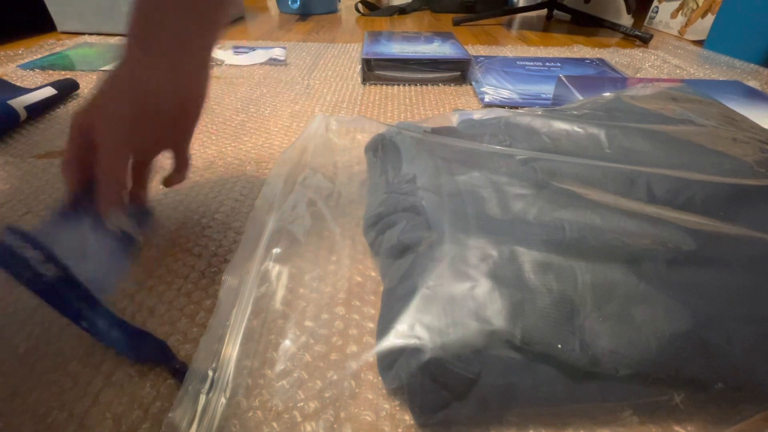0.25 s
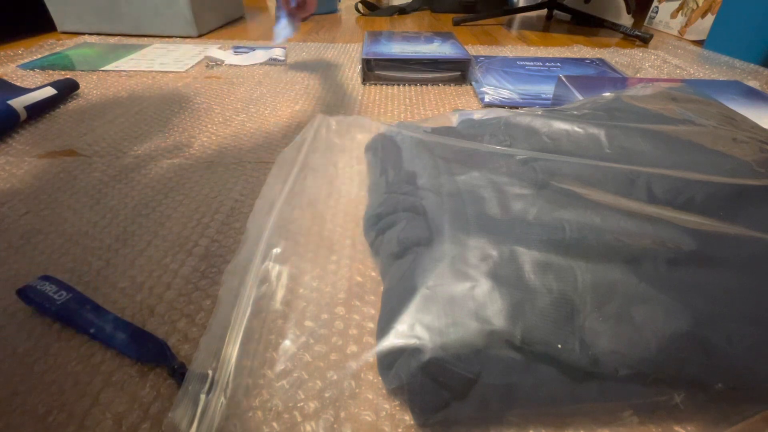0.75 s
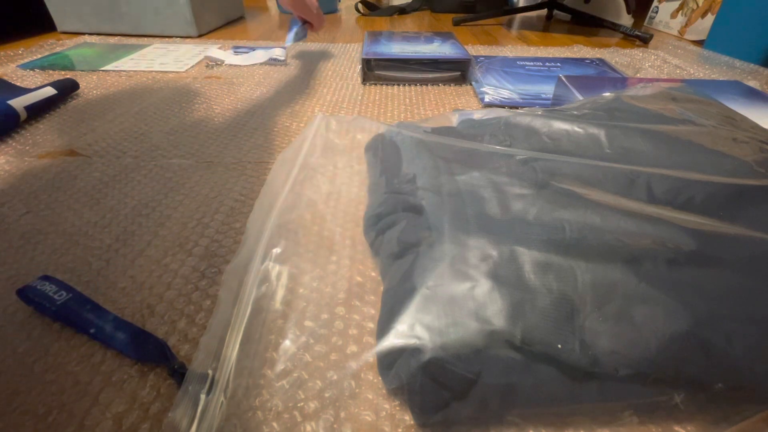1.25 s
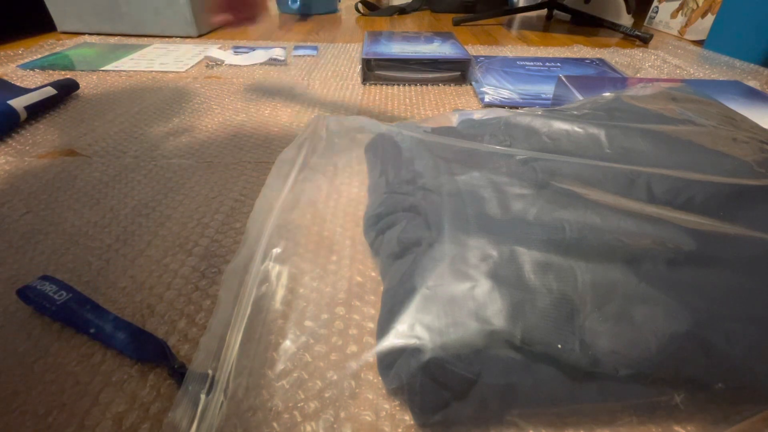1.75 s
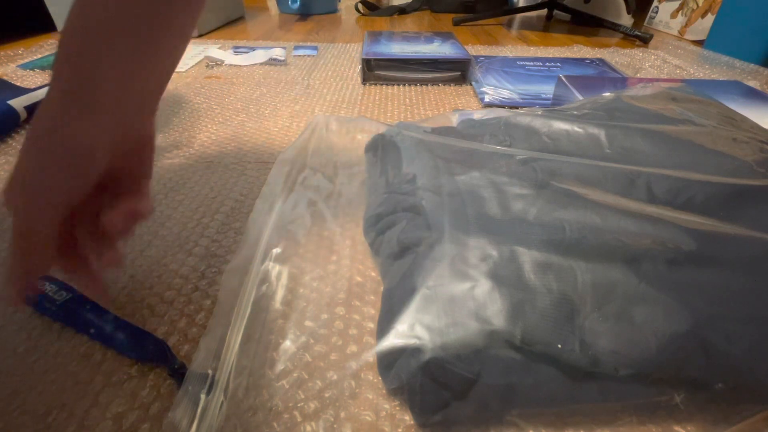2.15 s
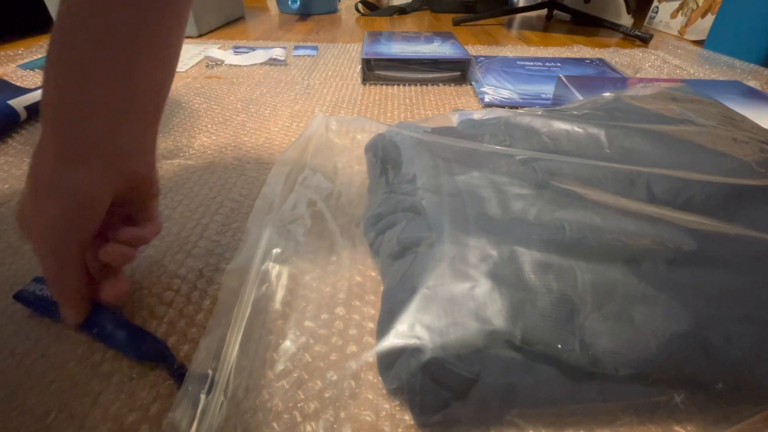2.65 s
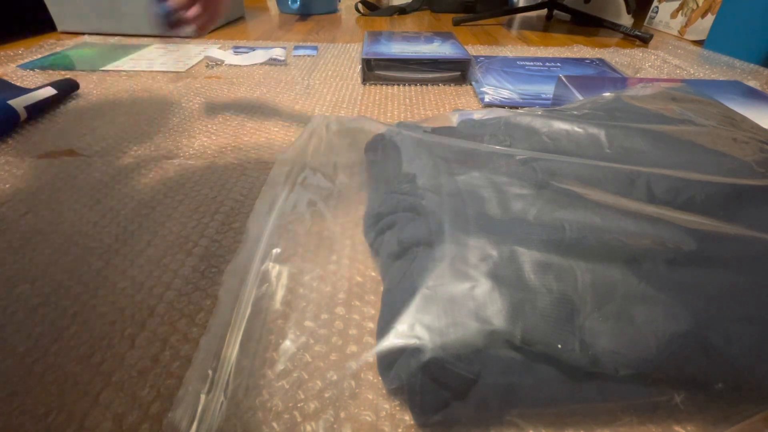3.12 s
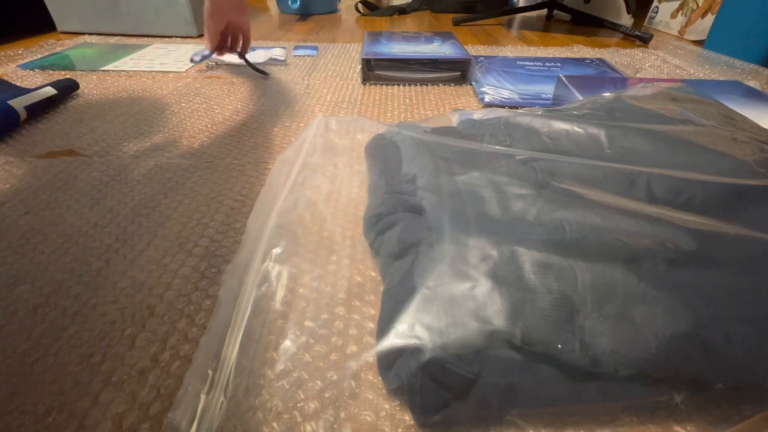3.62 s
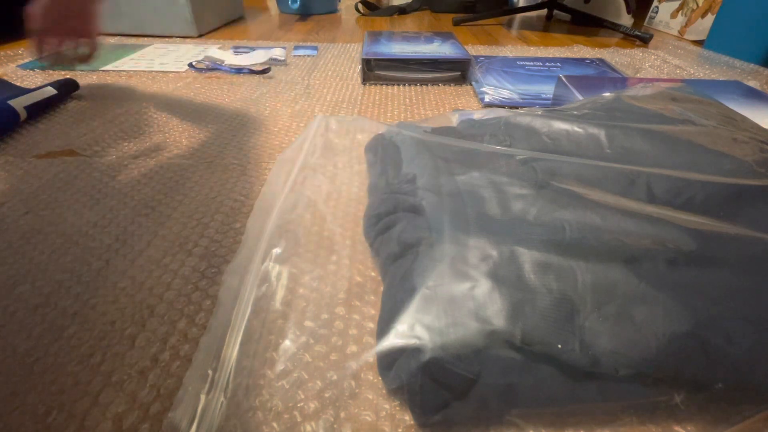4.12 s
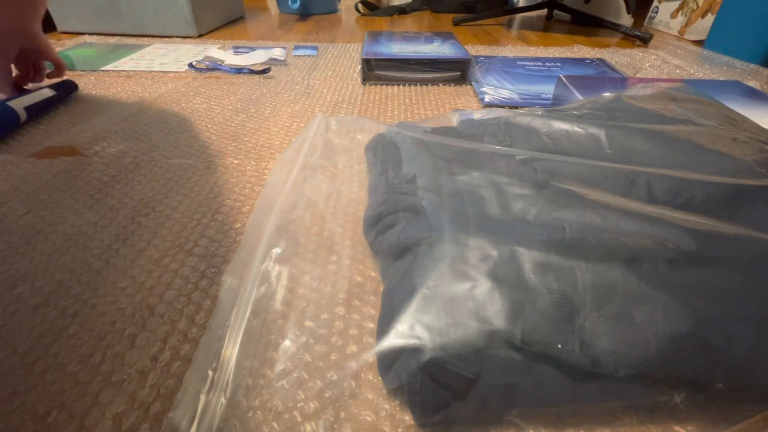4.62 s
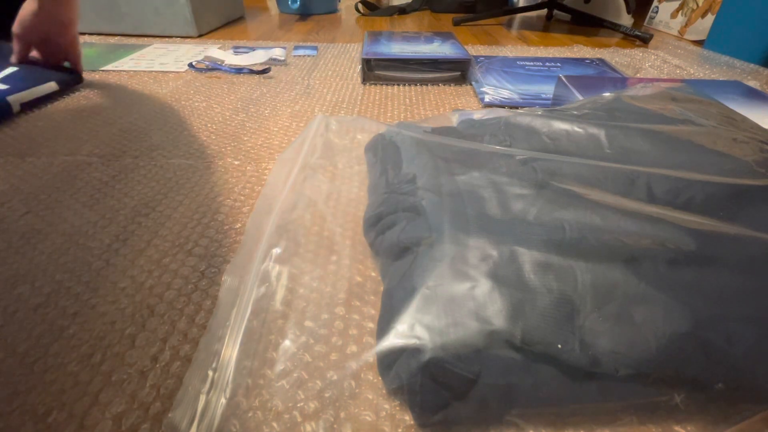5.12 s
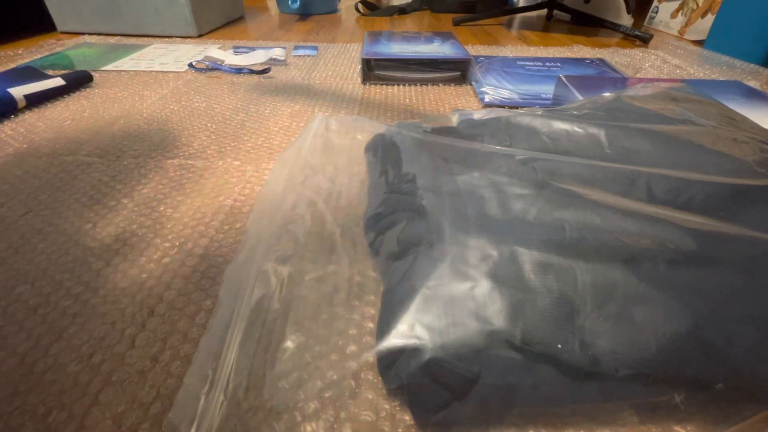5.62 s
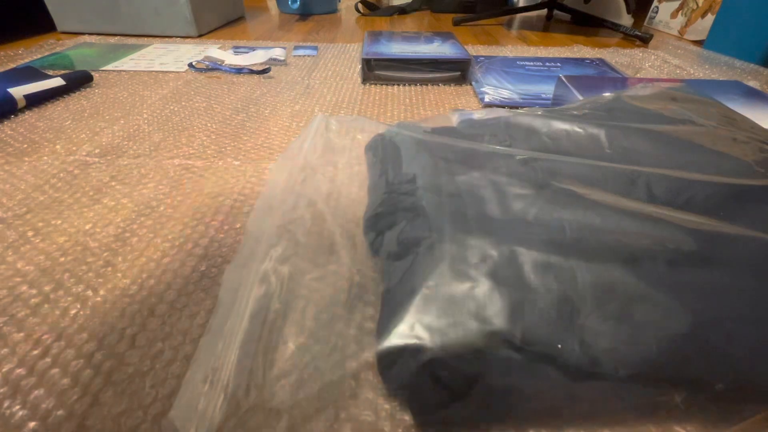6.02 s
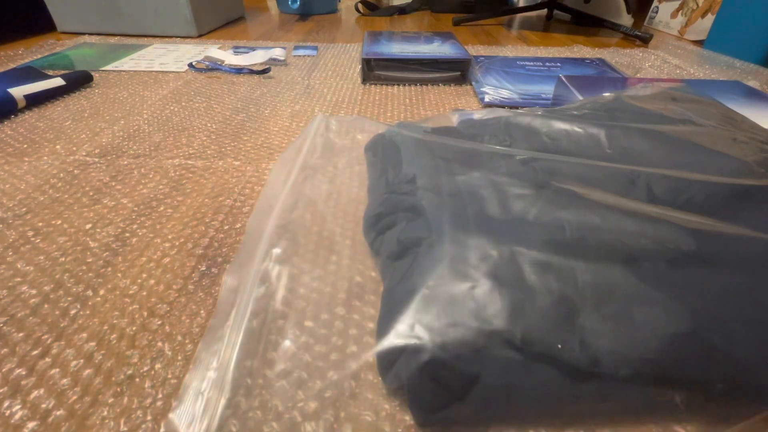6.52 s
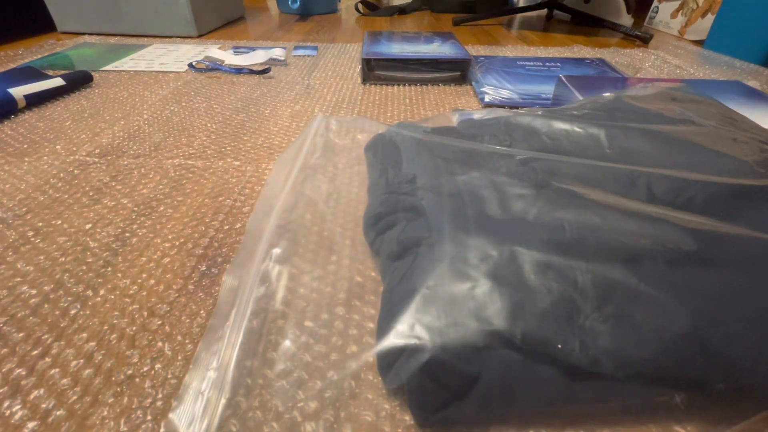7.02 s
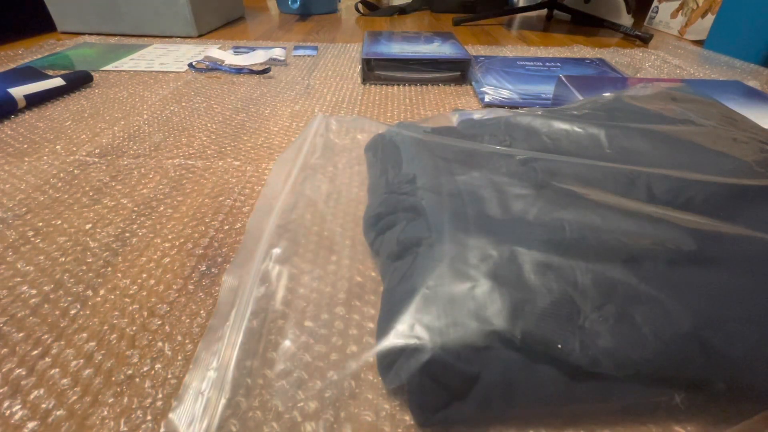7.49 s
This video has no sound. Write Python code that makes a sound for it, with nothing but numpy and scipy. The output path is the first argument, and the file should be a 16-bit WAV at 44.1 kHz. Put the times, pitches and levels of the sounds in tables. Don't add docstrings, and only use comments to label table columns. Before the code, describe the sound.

A hand close on the left squeezes thin plastic film in a bright crackling burst with small taps, then pauses. A second, drier crinkle follows as a strap is pinched and pulled. Softer hissing drags over bubble wrap come next. Finally the person gets up: cloth swishes, a sharp snap, a low heel thud and wooden board knocks. Stereo microphone on the floor of a quiet, lightly humming small room.

```python
import sys
import numpy as np
from scipy import signal
from scipy.fft import rfft, irfft
from scipy.io import wavfile
from scipy.ndimage import uniform_filter1d, map_coordinates

SR = 44100
rng = np.random.default_rng(int(sys.argv[2]) if len(sys.argv) > 2 else 0)


def gain_from_decibels(decibels):
    exponent = np.asarray(decibels, float) / 20
    return 10 ** exponent


def wav_out(sig):
    wavfile.write(sys.argv[1], SR, np.round(np.clip(np.atleast_2d(sig).T, -1, 1) * 32767).astype(np.int16))


N = 341775
HZ = np.fft.rfftfreq(N, 1 / SR) + 1e-3
SECONDS = np.arange(N) / SR


def rms_one(x):
    return x / np.sqrt(np.mean(x ** 2) + 1e-20)


def at_hz(points, hz=HZ):
    table_hz, values = np.transpose(points)
    return np.interp(np.log(hz), np.log(table_hz), values)


def coloured(x, spectrum):
    return rms_one(irfft(rfft(x) * gain_from_decibels(at_hz(spectrum)), N))


def band_pass(order, low_hz, high_hz):
    return signal.butter(order, [low_hz, high_hz], "band", fs=SR, output="sos")


def drift(rate_hz):
    knots = rng.standard_normal(2000)
    return rms_one(map_coordinates(knots, [np.arange(N) * rate_hz / SR], order=2))


def in_time(moves):
    t = np.arange(0, N + 32, 32) / SR
    main, second = 1e-14, 1e-14
    for s, db, rise_s, fall_s, other_db in moves:
        away = np.abs(t - s) / np.where(t < s, rise_s, fall_s)
        power = gain_from_decibels(db - 20 * away ** 1.44) ** 2
        main = main + power
        second = second + power * gain_from_decibels(other_db) ** 2
    return [np.interp(SECONDS, t, np.sqrt(power)) for power in (main, second)]


def add(out, s, piece):
    i = round(s * SR)
    out[..., i:i + piece.shape[-1]] += piece[..., :N - i]


def creases(per_s, spread_db, clump_db, patch_db, hiss):
    born = rng.random(N) < per_s * gain_from_decibels(clump_db * drift(70)) / SR
    sizes = rms_one(born * gain_from_decibels(spread_db * np.minimum(rng.exponential(1, N), 5)))
    dealt = rng.integers(0, 5, N)
    signs = rng.choice([-1, 1], (2, N))
    skin = hiss / 2 * rng.standard_normal((2, N))
    grain = 0
    for k, hz in enumerate(800 * 1.8 ** np.arange(5)):
        pops = sizes * signs * (dealt == k) + skin
        flicker = gain_from_decibels(patch_db * drift(35))
        grain = grain + flicker * signal.sosfilt(band_pass(1, hz, 1.9 * hz), pops)
    return grain / np.sqrt(uniform_filter1d(grain ** 2, size=1500))


# peak in seconds, rustle in dB, rise in seconds, fall in seconds,
# top of the rustle in dB relative to it.
SQUEEZES = [(0.0, -58.5, .05, 0.15, -6), (0.085, -58, 0.022, .14, -9), (0.15, -59.5, 0.059, 0.09, 3),
            (0.2, -47, 0.056, 0.071, -7), (0.352, -53.5, .008, 0.017, -9), (0.378, -64, .02, 0.026, -7),
            (1.368, -59.5, 0.013, 0.054, -4), (0.58, -81, 0.13, 0.36, -5), (0.84, -84, 0.16, 0.89, -2.5),
            (3.15, -98.5, .3, .4, 10), (2.205, -60.5, 0.015, 0.05, -8), (2.29, -69, 0.096, 0.15, -7.5),
            (2.345, -54.5, 0.017, 0.11, -12), (2.47, -60, 0.013, 0.13, -4),
            (2.555, -56.5, 0.022, 0.19, -2.5), (2.66, -57.5, 0.16, 0.1, -12), (2.76, -65, 0.011, 0.067, -1),
            (2.83, -59, 0.067, 0.062, -6), (2.888, -57, .02, 0.034, -10), (3.4, -76.5, 0.016, 0.099, 1),
            (3.52, -72, 0.03, 0.07, -2), (3.73, -72.5, 0.14, 0.079, -2.5)]
# frequency in Hz, level in dB per Hz.
FILM_COLOUR = [(410, -66), (700, -33), (972, -13), (1710, -13), (2100, -6), (3740, 1), (5570, 0.5),
               (6160, 4), (8660, 1.5), (10100, -17.5), (10500, -38), (13600, -37), (22000, -120)]
FILM_TOP_COLOUR = [(5880, -86), (10600, -9), (11600, -13), (12400, -7), (13100, -7.5), (14700, -16.5),
                   (15700, -15), (16300, -30)]


def crinkle():
    level, top = in_time(SQUEEZES)
    grain = creases(5000, spread_db=1.5, clump_db=6.0, patch_db=4.5, hiss=0.4)
    return level * coloured(grain, FILM_COLOUR) + gain_from_decibels(4.5) * top * coloured(grain, FILM_TOP_COLOUR)


# peak in seconds, hiss in dB, rise in seconds, # fall in seconds, top in dB relative to the hiss.
DRAGS = [(1.447, -57.5, .04, 0.091, -1.5), (4.46, -63, 0.088, 0.12, -2), (4.543, -65, .025, 0.11, -12),
         (4.72, -68, 0.026, 0.14, -15), (5.03, -60.5, 0.44, 0.3, -0.5), (5.18, -61.5, 0.29, 0.12, -12),
         (5.244, -56.5, 0.011, 0.074, -10), (5.65, -65, .25, 0.27, -0.5), (5.95, -73, 0.11, 0.19, 1.5),
         (6.085, -56, 0.026, 0.11, -18), (6.28, -70.5, 0.17, 0.24, -4), (6.505, -66.5, 0.043, 0.25, -5.5),
         (6.83, -67, 0.27, 0.56, -8), (7.05, -65.5, 0.42, 0.29, -4.5), (7.32, -70, 0.073, 0.062, -17),
         (7.72, -71.5, 0.37, 0.24, -7)]
# frequency in Hz, level in dB per Hz.
SHEET_COLOUR = [(410, -37), (700, -12), (1230, -1.5), (1660, -2.5), (2670, 3), (4340, -5), (5080, 1.5),
                (5500, -1.5), (6450, 1.5), (7470, -3), (8860, -5), (10500, -12), (13600, -47),
                (22000, -120)]
FAR_SHEET_COLOUR = [(880, -4), (1500, -10), (3300, -7.5), (5090, -6), (5610, -8.5), (8290, -2),
                    (10500, -9.5), (13600, -81), (22000, -120)]


def slide():
    stands_up_s = 5.4
    level, top = in_time(DRAGS)
    grain = creases(12000, spread_db=3.0, clump_db=4.5, patch_db=3.5, hiss=0.69)
    near, far = coloured(grain, SHEET_COLOUR), coloured(grain, FAR_SHEET_COLOUR)
    drag = np.where(SECONDS < stands_up_s, near, far)
    return gain_from_decibels(1.66) * level * drag + gain_from_decibels(-1.5) * top * coloured(grain, FILM_TOP_COLOUR)


def ring(clicks, hz, t60_s):
    decay = gain_from_decibels(-60 / (t60_s * SR))
    turn = 2 * np.pi * hz / SR
    return signal.lfilter([0, np.sin(turn)], [1, -2 * decay * np.cos(turn), decay ** 2], clicks)


# peak in seconds, peak in dB, top in dB relative to the peak, length in milliseconds.
CARD_CREASES = [(0.0039, -50, -3, 2.4), (0.0071, -52, 0, 2.5), (0.0184, -48, 0, 3.5), (0.031, -52, -8, 1.5),
                (0.044, -61, 9, 0.97), (0.074, -47, -3, 3.6), (0.0822, -57, 7, 1.2), (0.0881, -58, 9, 1.2),
                (0.1037, -47, -1, 1.8), (0.1168, -51, 2, 3.9), (0.1229, -55, 5, 1.3), (0.1583, -47, 7, 1.3),
                (0.1766, -35.5, -3, 2.9), (0.2119, -42, 7, 2.9), (0.2317, -49, -1, 1.4),
                (0.2591, -50, 0, 2.7), (0.2773, -62, -2, 1.5), (0.3522, -49.5, 2.5, 5.8),
                (0.3665, -60, 10, 1.4), (0.3774, -54, -4, 2.4), (0.4234, -65, -1, 1.3),
                (0.4353, -64, 8, 1.5), (0.4388, -68, 16, 1.4), (0.4623, -65, -2, 1.3),
                (0.4763, -59.5, -1, 1.7), (0.7468, -81, 18, 1.3), (1.1035, -61, 1, 1.8),
                (1.3643, -57, 5, 2.8), (1.3739, -58, -2, 2.2), (1.7333, -65, -16, 1.9)]
PULLED_CREASES = [(2.207, -43, 1.5, 3.4), (2.2165, -62, 9, 2.0), (2.2234, -55, 10, 1.2),
                  (2.2341, -64, 9, 1.2), (2.2678, -53, -13, 1.9), (2.2819, -61, -11, 1.8),
                  (2.2884, -61, -6, 2), (2.2927, -57, -11, 1.8), (2.2983, -64, 7, 1.3),
                  (2.3366, -55, -5, 2.1), (2.3404, -45, -9, 1.2), (2.3454, -48, -11, 1.2),
                  (2.3502, -47, -13, 1.4), (2.3546, -57, -4, 2), (2.3608, -53, -5, 2.0),
                  (2.376, -47, -3, 4.7), (2.4048, -53, -14, 1.6), (2.4103, -47, -9, 2.2),
                  (2.4166, -50, -1, 1.0), (2.4198, -44.5, 1, 2.5), (2.4236, -54, -7, 1.7),
                  (2.4293, -58, -3, 1.2), (2.4575, -59, 15, 1.1), (2.4629, -49, 9, 1.5),
                  (2.4699, -45.5, -13, 2.8), (2.4806, -53, -7, 2.8), (2.4964, -42, -1, 2.1),
                  (2.5441, -49, -5, 1.3), (2.5518, -40, -5, 1.7), (2.5635, -54, 5, 2.3),
                  (2.5932, -56, 8, 0.96), (2.5995, -48, 0, 3.2), (2.6066, -41, -10, 1.2),
                  (2.6103, -42, -5, 1.3), (2.6136, -47, 2, 1.2), (2.6466, -55, 2, 2.1),
                  (2.6615, -51, -1, 2.9), (2.7051, -53, 6, 3.2), (2.7353, -70, 13, 1.3),
                  (2.7404, -71, 11, 2.1), (2.7586, -48, -4, 2.5), (2.8356, -41.5, 1, 1.9),
                  (2.8386, -56, 11, 1.0), (2.8461, -45.5, -6, 3.1), (2.8577, -43.5, 1, 4.4),
                  (2.8709, -54, -9, 3.4), (2.8865, -41, 1, 4.4), (2.8926, -47, 8, 1.8)]
LAST_CREASES = [(3.2096, -65, 0, 1.4), (3.3453, -78, 15, 1.6), (3.3825, -67, -2, 1.7),
                (3.3995, -69, 11, 1.5), (3.4168, -70, 9, 2.1), (3.4322, -70, 5, 2.8), (3.4692, -68, 9, 2.8),
                (3.5048, -68, 9, 1.3), (3.5083, -58, 14, 1.4), (3.5444, -69, 12, 1.5),
                (3.6922, -57, -14, 1.4), (3.7349, -59, -4, 2.4), (3.9858, -80, 20, 1.6),
                (4.3012, -65, 5, 1.5), (4.5414, -56, -16, 4.1), (4.6639, -59, -14, 1.4),
                (4.679, -62, 0, 1.6), (4.7212, -59, -8, 1.8), (5.2498, -49, -18, 3.3), (5.327, -60, 8, 1.3),
                (5.6354, -56, -15, 2.9), (5.6715, -54, 8, 2.3), (5.6991, -53, -13, 3.2),
                (5.7375, -56, -12, 2.3), (5.8303, -65, -2, 1.2), (6.279, -60, -11, 2.9),
                (6.4054, -62, 2.5, 1.6), (6.4472, -62, -3, 2.8), (6.5257, -61, 4, 2.8)]
# peak in seconds, peak in dB, top in dB relative to the peak,
# length in milliseconds, ring in Hz.
SMALL_TAPS = [
    (0.109, -38.5, -10, 2.4, 2970),
    (0.1955, -43, -6, 2.5, 3384),
    (4.344, -59, 2, 1.5, 2640),
    (5.2426, -46.5, -12, 3.85, 1480),
    (5.3033, -45.5, -16, 2.0, 900),
    (5.61, -39.5, -14, 2.0, 2680),
    (5.627, -50, -25, 12, 1920),
    (5.805, -60, -20, 2.5, 2400),
    (5.843, -56, -20, 3, 2200),
]


def ticks():
    out = np.zeros(N)
    t_ms = np.arange(1, 1200) / SR * 1000
    top, wide = band_pass(2, 11600, 14500), band_pass(2, 2600, 9000)
    events = list(SMALL_TAPS)
    for row in list(CARD_CREASES) + list(PULLED_CREASES) + list(LAST_CREASES):
        film_hz = 6780 * (1 + 0.038 * rng.standard_normal())
        events.append((*row, film_hz))
    for s, peak_db, top_db, length_ms, hz in events:
        rise_ms = max(0.38 * (length_ms - .9), .07)
        pop = rng.standard_normal(len(t_ms)) * t_ms * np.exp(-t_ms / rise_ms)
        pop[round(rise_ms * SR / 1000)] = 1.6 * rise_ms
        body = rms_one(ring(pop, hz, 15 / hz)) + rms_one(signal.sosfilt(wide, pop))
        flick = signal.sosfilt(top, pop)
        body, flick = (v / np.sqrt(2 * uniform_filter1d(v ** 2, size=35).max()) for v in (body, flick))
        tick = gain_from_decibels(peak_db + 0.5) * (body + gain_from_decibels(top_db + 1.0) * flick)
        add(out, s - rise_ms / 1000 - .0003, tick)
    return out


def blow(colour, cycles, shortest_s, rise_s):
    t, out = np.arange(1, 14001) / SR, 0
    edges = 25 * 2 ** np.arange(0, 9.6, .5)
    for low, high in zip(edges, edges[1:]):
        hz = np.sqrt(low * high)
        t60_s = shortest_s + cycles / hz
        excite = rng.standard_normal(len(t)) * gain_from_decibels(-60 * t / t60_s) * (1 - np.exp(-t / rise_s))
        band = rms_one(signal.sosfilt(band_pass(3, low, high), excite))
        out = out + gain_from_decibels(at_hz(colour, hz)) * np.sqrt(hz) * band
    return out / np.abs(out).max()


# start in seconds, peak in dB, cycles of ring, shortest 60 dB decay in seconds, rise in seconds.
KNOCK_EVENTS = [
    (0.1335, -40, 22, 0.012, 0.002),
    (6.074, -43, 26, 0.0067, 0.0016),
    (6.2284, -34, 7.6, 0.013, 0.0016),
    (6.662, -35, 9.7, 0.003, 0.00018),
    (6.774, -45, 4.3, 0.014, 0.0003),
    (7.27, -39.5, 11, 0.018, 0.00098),
    (7.494, -44, 22, 0.013, 0.0011),
]
# frequency in Hz, level in dB per Hz.
CARD_COLOUR = [(180, -62), (300, -12), (970, -18), (1680, -58), (2800, 12.5), (3630, -64.5), (5000, -8),
               (5600, 5.5), (14000, -22)]
SNAP_COLOUR = [(180, -28), (300, -1.5), (793, -5.5), (2730, -2), (4830, -15.5), (5550, -28), (8290, -4.5),
               (10300, -29), (12000, -20), (15600, -60), (22000, -120)]
HEEL_COLOUR = [(15, -35), (25, -2.5), (111, 4), (151, -9), (243, -17), (400, -42), (600, -52), (780, -61),
               (1320, -120)]
BOARD_COLOUR = [(41, -36), (70, -12.5), (287, 2), (420, -1.5), (600, -19), (955, -17.5), (1330, -22),
                (1730, -33), (2700, -33), (3800, -60), (9900, -120)]
REBOUND_COLOUR = [(290, -29), (500, -10), (998, 10), (1920, -32), (2430, -5), (8160, -0.5), (12000, -43),
                  (15600, -66), (22000, -120)]
CRACK_COLOUR = [(88, -41), (150, -3), (872, -7), (2480, -8), (3030, 2.5), (4070, 0), (5070, -3),
                (5760, -11), (12000, -24), (15600, -68), (22000, -120)]
STEP_COLOUR = [(24, -30), (40, -8), (81, 8), (241, 7), (420, -18), (700, -46), (910, -76), (1540, -120)]
# start in seconds, frequency in Hz, peak in dB, 60 dB decay in seconds.
KNOCK_TONES = [(0.133, 976, -42, 0.074), (0.135, 2050, -29, 0.025), (.1352, 2830, -30, 0.012),
               (0.133, 2830, -28, 0.012), (0.1335, 4970, -33, 0.012), (0.133, 6840, -32, 0.009),
               (0.135, 12500, -37, 0.006), (4.163, 125, -58, 0.08), (5.306, 334, -48, 0.11),
               (5.306, 415, -54, 0.07), (5.307, 215, -48, 0.1), (5.306, 112, -47, 0.12),
               (6.0745, 1930, -31, 0.014), (6.075, 316, -40, 0.03), (6.075, 1360, -34, 0.018),
               (6.074, 2650, -33, 0.007), (6.074, 4160, -41, 0.011), (6.074, 4710, -42, 0.018),
               (6.0733, 8100, -34, 0.012), (6.233, 68, -22.5, 0.19), (6.229, 104, -24, 0.09),
               (6.232, 231, -36.5, 0.11), (6.662, 260, -24, 0.13), (6.6612, 720, -25, 0.022),
               (6.6634, 420, -25, 0.035), (6.664, 102, -33, 0.038), (6.661, 1300, -31, 0.012),
               (6.774, 1020, -34, 0.011), (6.774, 2600, -46, 0.012), (6.774, 3640, -44, 0.012),
               (6.774, 4890, -41, 0.015), (6.7733, 8200, -35, 0.008), (7.272, 256, -42, 0.19),
               (7.271, 430, -37, 0.03), (7.271, 560, -38, 0.025), (7.2703, 830, -32, 0.018),
               (7.27, 1330, -34, 0.011), (7.27, 2030, -35, 0.015), (7.2697, 3000, -32, 0.009),
               (7.2697, 3500, -30, 0.009), (7.2697, 5050, -30, 0.009)]


def knocks():
    out = np.zeros(N)
    colours = (CARD_COLOUR, SNAP_COLOUR, HEEL_COLOUR, BOARD_COLOUR, REBOUND_COLOUR, CRACK_COLOUR, STEP_COLOUR)
    for (s, peak_db, *ring_down), colour in zip(KNOCK_EVENTS, colours):
        add(out, s - .001, gain_from_decibels(peak_db + 7.5) * blow(colour, *ring_down))
    for s, hz, peak_db, t60_s in KNOCK_TONES:
        push = np.pad(np.hanning(3 + int(.6 * SR / hz)), (0, 15000))
        tone = ring(push / push.sum(), hz, t60_s)
        no_lean = signal.butter(2, hz / 5, "high", fs=SR)
        add(out, s, gain_from_decibels(peak_db) * signal.lfilter(*no_lean, tone))
    return out


# start in seconds, peak in dB, board pitch in Hz, cycles of ring.
WEIGHT_SHIFTS = [(0.11, -52.5, 390, 24), (1.37, -46, 255, 18), (1.458, -60, 62.6, 6),
                 (2.199, -60.5, 105, 30), (2.847, -59, 104, 4.5), (4.133, -61, 170, 8),
                 (4.299, -59, 190, 8), (5.076, -49.5, 119, 14), (5.304, -47, 295, 17),
                 (5.608, -55.5, 65, 10), (6.074, -46.5, 105, 7.7), (7.624, -43.5, 143, 5.6),
                 (7.65, -42, 432, 12)]


def thuds():
    out = np.zeros(N)
    for s, peak_db, hz, cycles in WEIGHT_SHIFTS:
        hump = [(0.1 * hz, -30), (hz, 0), (2.1 * hz, -14), (6 * hz, -40), (20 * hz, -80)]
        add(out, s - .003, gain_from_decibels(peak_db + 2.0) * blow(hump, cycles, shortest_s=0.033, rise_s=0.00078))
    return out


# peak in seconds, swish in dB, rise in seconds, fall in seconds,
# floor rumble in dB relative to the swish.
BODY_MOVES = [(0.2, -68, 0.15, 0.11, 10), (0.85, -83, 0.59, 0.98, 16.5), (1.45, -69.5, 0.14, 0.05, -9),
              (1.95, -88.5, 0.44, 0.42, 26), (3.0, -101, 0.46, 0.35, 37), (4.0, -98, .5, 0.32, 23),
              (4.62, -86.5, 0.33, 0.35, 23.5), (5.2, -85, 0.45, 0.31, 22), (5.63, -62, 0.17, 0.16, -8),
              (5.85, -68, 0.12, 0.098, 15.5), (6.13, -69.5, 0.18, 0.31, 14), (6.58, -75.5, 0.2, 0.24, 21.5),
              (6.97, -63.5, 0.71, 0.41, 7), (7.33, -72, 0.15, 0.09, 17), (7.75, -62, 0.29, .2, 11)]
# frequency in Hz, level in dB per Hz.
CLOTH_COLOUR = [(88, -20), (150, 1), (404, -2.5), (539, -5), (1510, -8.5), (1910, -13), (3000, -21),
                (3900, -53), (6600, -120)]
RUMBLE_COLOUR = [(12, -46), (20, -14.5), (52, -9.5), (73, 6.5), (86, -8), (97, -17), (105, -6.5),
                 (140, -45), (230, -120)]


def moving_body():
    moving, weight = in_time(BODY_MOVES)
    flutter = gain_from_decibels(3.3 + 1.48 * drift(22) + 1.2 * drift(160))
    swish = (moving + gain_from_decibels(-94.5)) * flutter * coloured(rng.standard_normal((2, N)), CLOTH_COLOUR)
    floor = weight * gain_from_decibels(-3.5) + gain_from_decibels(-73.5)
    return swish + floor * coloured(rng.standard_normal((2, N)), RUMBLE_COLOUR)


# frequency in Hz, level in dB per Hz.
AIR_COLOUR = [(59, -30), (100, 2.5), (156, 5), (185, -6.5), (255, 6), (289, -7.5), (471, -14), (621, -20),
              (1390, -21.5), (2580, -26.5), (3120, -26.5), (5080, -25.5), (9410, -24.5), (12900, -26.5),
              (16000, -43.5)]


def room_air():
    return gain_from_decibels(-73) * coloured(rng.standard_normal((2, N)), AIR_COLOUR)


# frequency in Hz, 60 dB decay in seconds.
ROOM_DECAY = [(100, 0.57), (1000, 0.24), (4000, 0.22), (12000, 0.14)]


def room(x):
    tail = np.zeros((2, 20000))
    edges = 60 * 2. ** np.arange(9)
    t = np.arange(19700) / SR
    for low, high in zip(edges, edges[1:]):
        fade = gain_from_decibels(-60 * t / at_hz(ROOM_DECAY, low))
        for side in tail:
            noise = rng.standard_normal(len(t)) * fade
            side[300:] += min(low / 700, 1) * signal.sosfilt(band_pass(2, low, high), noise)
    tail /= np.sqrt(np.sum(tail ** 2) / 2)
    return gain_from_decibels(-10.5) * signal.fftconvolve(x[None], tail, axes=1)[:, :N]


# frequency in Hz, left minus right in dB.
LEFT_SHADING = [(60, 2.7), (110, 0.77), (200, 4.4), (380, 2.3), (700, 5.8), (1290, 2.3), (2380, 5.2),
                (4400, 11), (8120, 3.8), (15000, 0.5)]
# frequency in Hz, how far the left leads in radians.
LEFT_LEAD = [(0, 0.15), (340, 1.22), (650, 1.3), (950, 5.06), (2500, 5.04), (3200, 8.4), (7500, 22),
             (9000, 16.5), (10500, 16.2), (12600, 14)]
# frequency in Hz, left minus right in dB; then lead in radians.
BEHIND_SHADING = [(60, .7), (200, -1.5), (380, 1), (700, 4), (1290, 0.2), (4400, 7), (8100, 2.2)]
BEHIND_LEAD = [(0, -.6), (130, -.8), (280, -.5), (600, -1.8), (2930, -2.8), (9000, 3.5)]
# frequency in Hz, shared share from 0 to 1.
SHARED_SOUND = [(60, 0.87), (300, 1), (900, 0.71), (3000, 0.93), (7000, 0.21), (10000, 0.4), (12500, 0.55)]


def ports(x, side_on, lead_share, shading=LEFT_SHADING, leads=LEFT_LEAD):
    one, other = rfft(x[0]), rfft(x[1])
    left = gain_from_decibels(side_on * at_hz(shading))
    share = np.clip(at_hz(SHARED_SOUND), 0, .99)
    lead = lead_share * np.interp(HZ, *np.transpose(leads))
    both = np.sqrt(left ** 2 + 1 + 2 * left * share * np.cos(lead)) / 2
    right = share * np.exp(-1j * lead) * one + np.sqrt(1 - share ** 2) * other
    return irfft(np.array([left * one, right]) / both, N)


BEHIND_SPAN = (6.2, 7.2)


def scene():
    hand = crinkle() + slide()
    hits = ticks() + knocks() + thuds()
    bounced = np.array([hits, np.roll(hits, 57)])
    behind = np.digitize(SECONDS, BEHIND_SPAN) == 1
    near = ports(hand + bounced * ~behind, side_on=1.0, lead_share=0.91)
    back = ports(bounced * behind, 1, 1, BEHIND_SHADING, BEHIND_LEAD)
    around = ports(moving_body() + room_air(), side_on=0.86, lead_share=0.96)
    return near + back + around + room(hand[0] + hits)


def band_limit(x):
    return signal.sosfilt(signal.butter(12, 16060, fs=SR, output="sos"), x)


# centre in Hz, width in Hz, depth from 0 to 1.
TREBLE_DIPS = [
    (5560, 170, 0.64),
    (7480, 280, 0.6),
    (10500, 740, 0.55),
]


def record(dry):
    response = np.prod([1 - depth * np.exp(-((HZ - hz) / width) ** 2) for hz, width, depth in TREBLE_DIPS], axis=0)
    left, right = rfft(dry) * response
    mid = (left + right) / 2
    side = (left - right) / 2 / (1 + (HZ / 12600) ** 40)
    mix = irfft(np.array([mid + side, mid - side]), N)
    return band_limit(mix)


dry = scene()
out = record(dry)
wav_out(out)
```